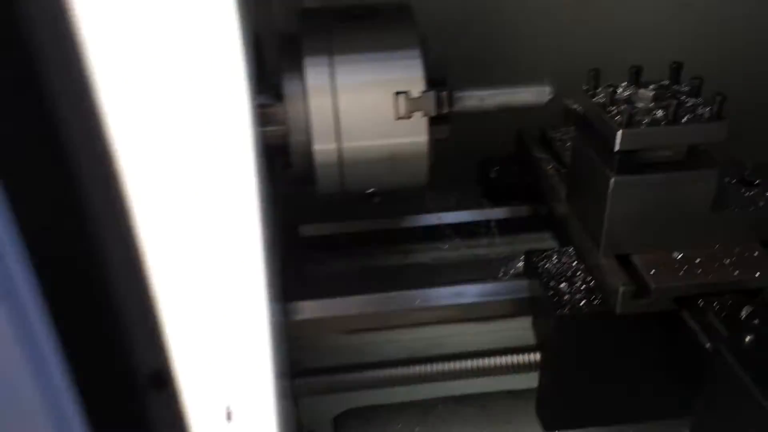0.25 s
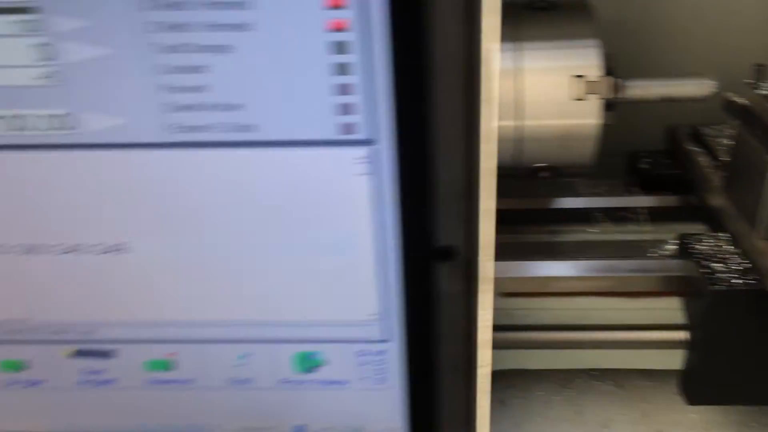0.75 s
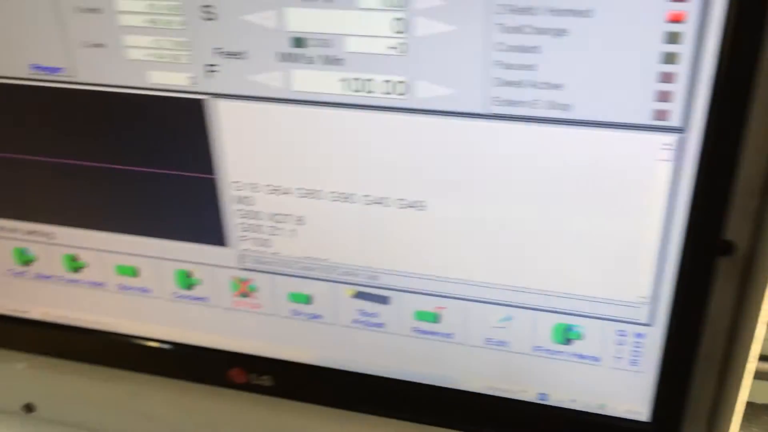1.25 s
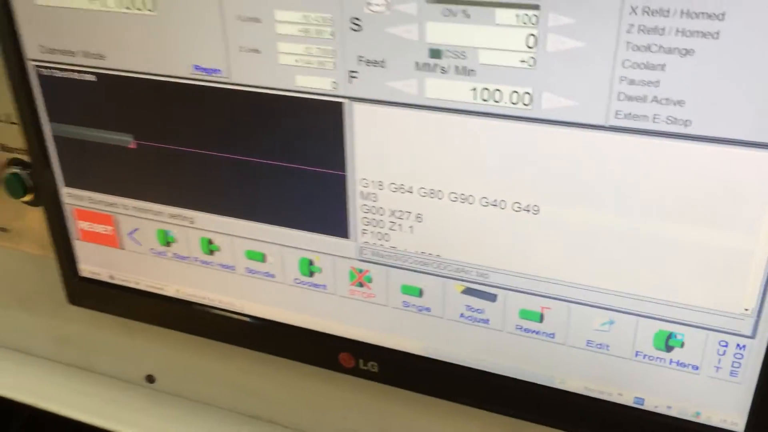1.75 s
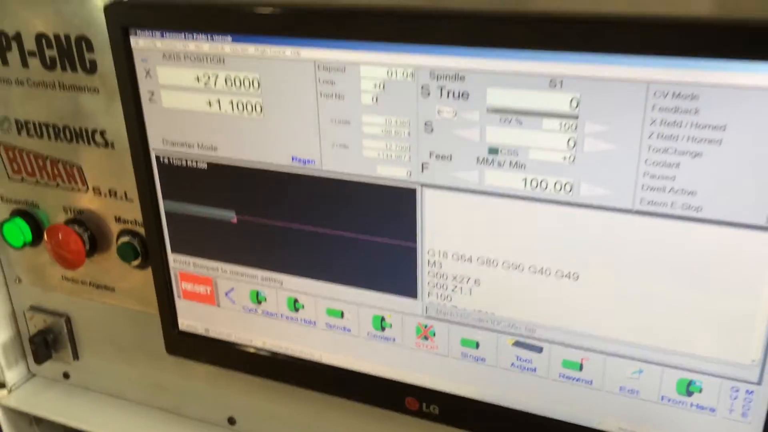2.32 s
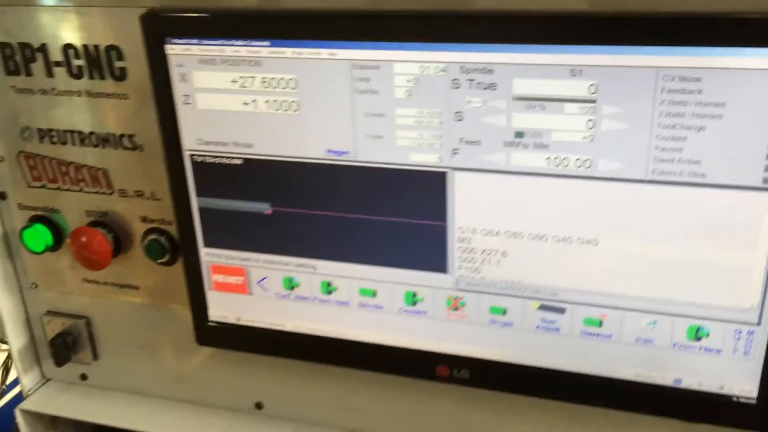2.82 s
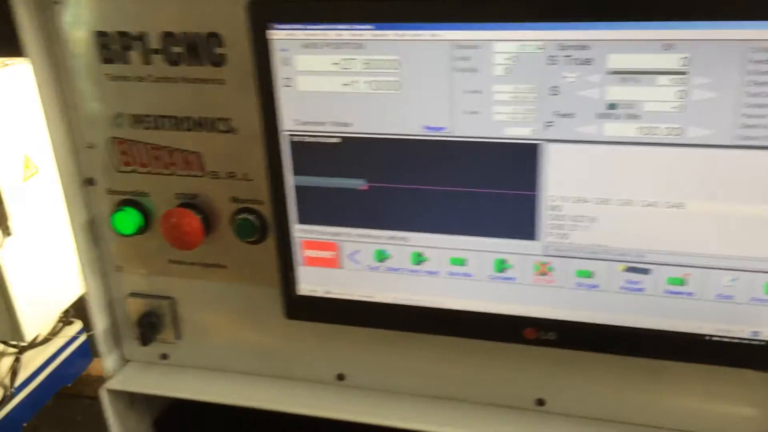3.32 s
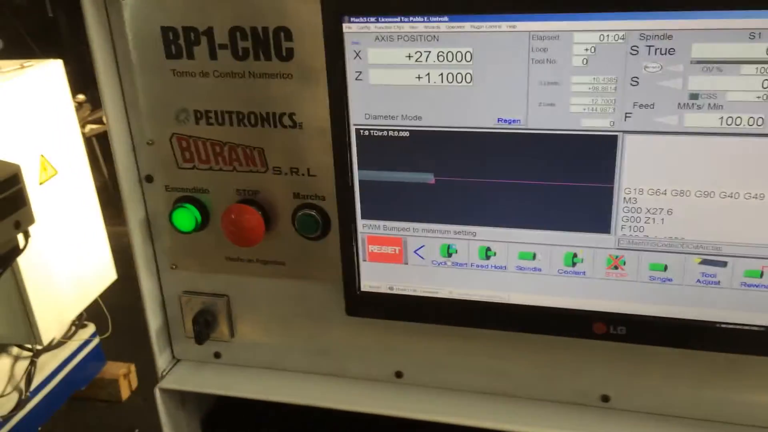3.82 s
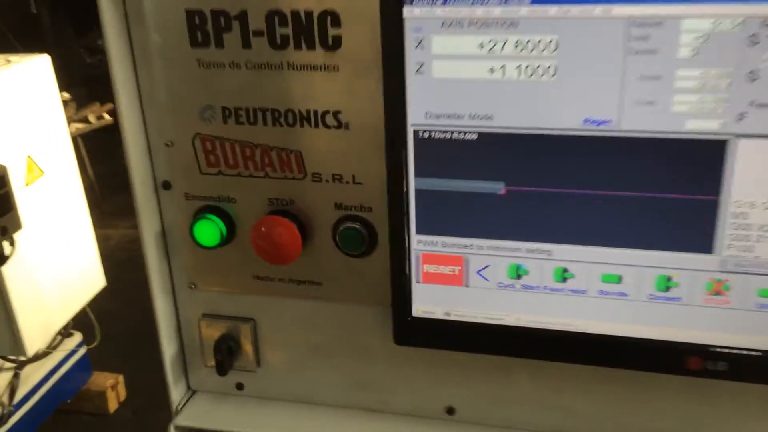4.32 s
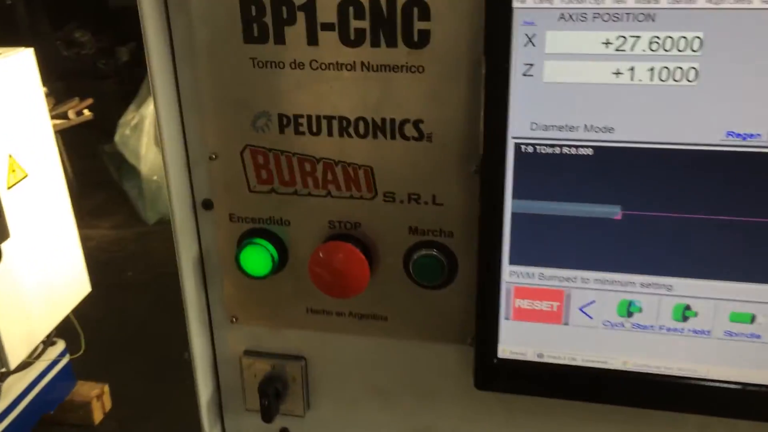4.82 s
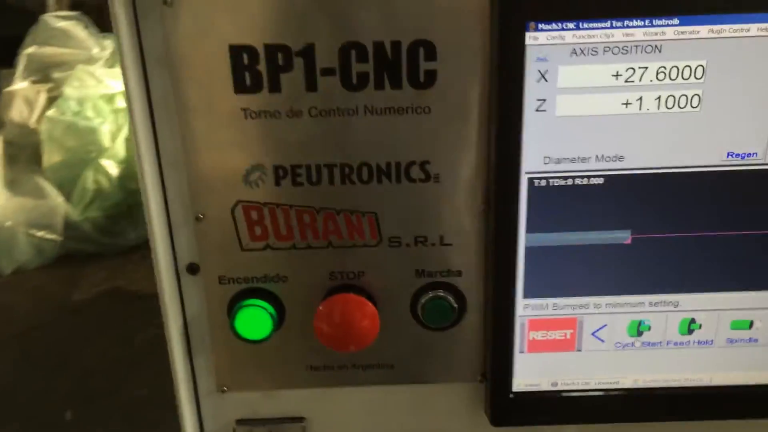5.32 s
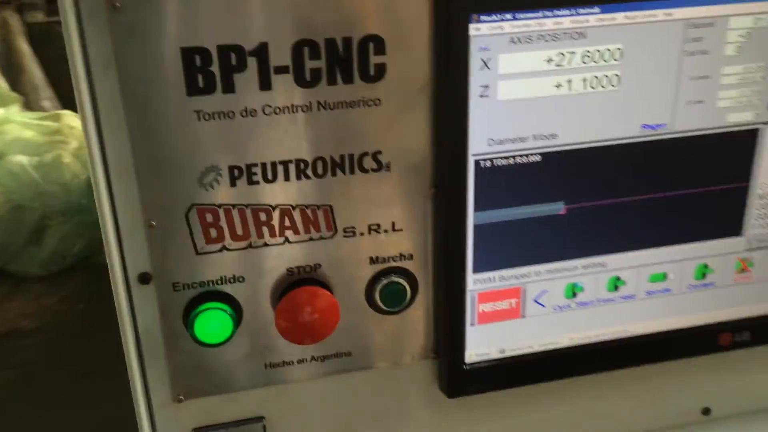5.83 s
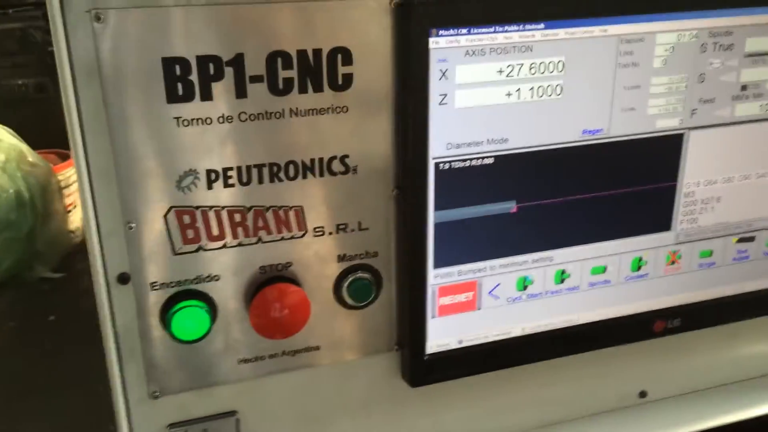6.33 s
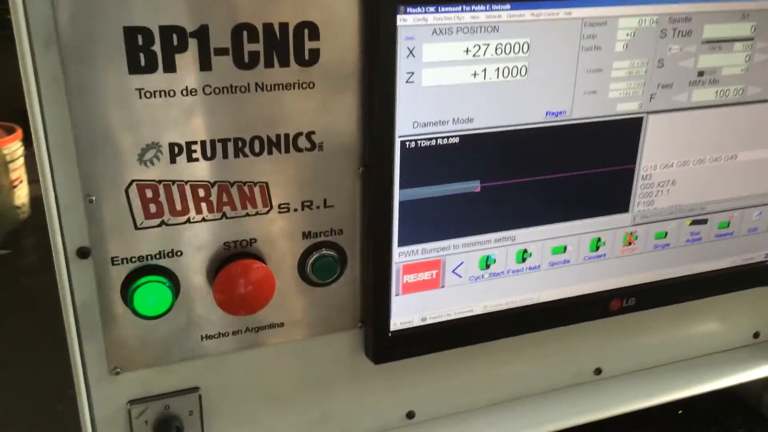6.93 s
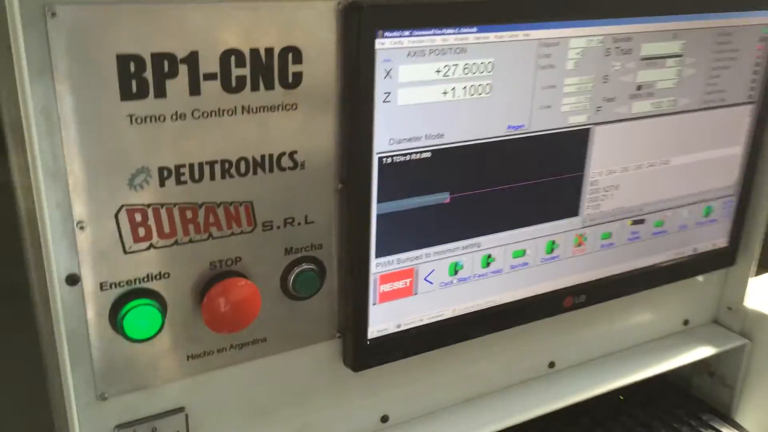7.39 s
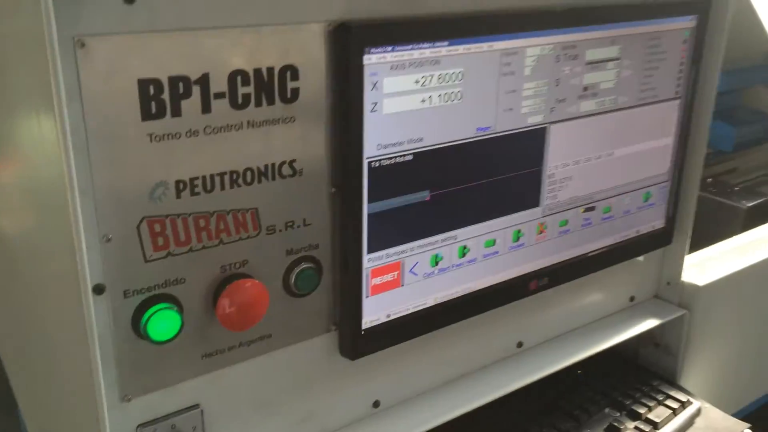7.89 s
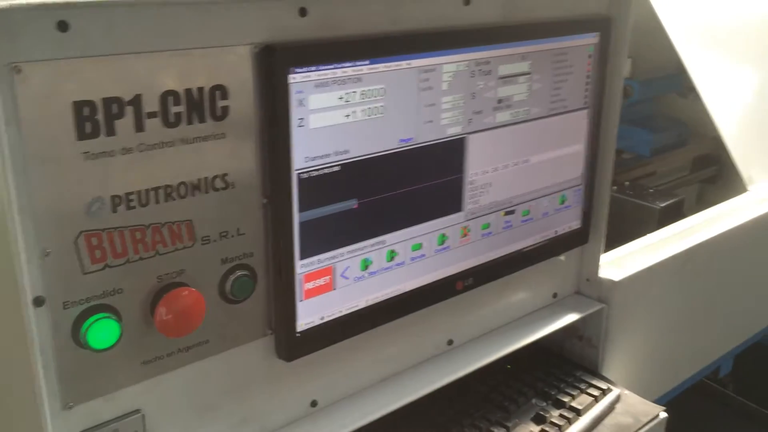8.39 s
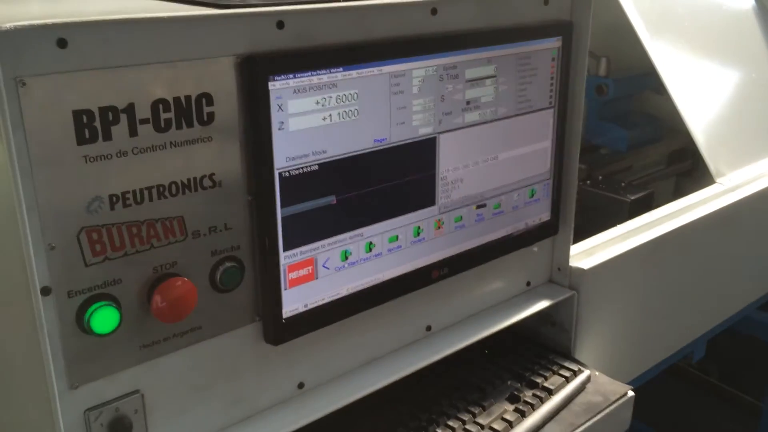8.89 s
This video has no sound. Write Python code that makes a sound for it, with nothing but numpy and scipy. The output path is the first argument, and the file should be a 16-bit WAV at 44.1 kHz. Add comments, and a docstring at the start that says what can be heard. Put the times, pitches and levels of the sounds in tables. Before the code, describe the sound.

A strong, bright hiss of compressed air is heard from the start, close to a lathe in a workshop. A thin, high whistle sputters on top, while a quieter drive hum and cooling fan run steadily underneath throughout. The hiss surges unevenly, turning rougher or sharper as the air lands, with flares around 0.8 seconds, from 2.2 to 2.7 seconds and from 4.5 to 5.3 seconds. At about 6.1 seconds the air shuts off and dies away in the hall, leaving the hum and fan. The hose gives one soft spit at 6.6 seconds. At about 7.5 seconds the jet and its whistle restart abruptly. Just after, near 7.7 seconds, a low thump shudders through the sheet-metal housing and fades within about half a second. The hiss continues, swelling again until the end, just past 9 seconds.

```python
"""A strong hiss, most likely a compressed-air jet, beside a CNC lathe in a workshop.
The turbulent air roars where it lands; eddies at the nozzle add a thin whistle.
The valve shuts, the hiss dies away in the hall, the hose spits once and the jet restarts.
Just after that a low thump shudders through the sheet-metal housing.
The drives hum and a cooling fan runs throughout."""
import sys
import numpy as np
from scipy import signal
from scipy.fft import rfft, irfft
from scipy.io import wavfile
from scipy.ndimage import uniform_filter1d

SR = 44100
rng = np.random.default_rng(int(sys.argv[2]) if len(sys.argv) > 2 else 0)


def transcribe(u):
    """Save the signal u as a 16-bit wav file named by the first command-line argument.

    u: samples, shape (n,) or (channels, n), limited to [-1, 1]; the rate is SR.
    q: integer samples, one column per channel.
    """
    v = np.clip(np.atleast_2d(u).T, -1, 1)
    q = np.round(v * 32767).astype(np.int16)
    wavfile.write(sys.argv[1], SR, q)


N = 403498
TIME_S, FREQS_HZ = np.arange(N) / SR, np.fft.rfftfreq(N, 1 / SR)
SHUT_S, REOPEN_S = 6.14, 7.457  # air valve

# Air hiss spectrum. Each row: frequency in Hz, relative density in dB.
HISS_SPECTRUM = [(500, -48), (1800, -16), (3000, -12.5), (4000, -4), (5200, 0), (7000, 0.5), (9500, -0.5),
                 (11500, -4.5), (15000, -6)]


def compressed_air():
    """Two runs of the jet, with hall decay and a puff in the pause."""
    # Hiss and whistle envelopes per run. Each row: time in seconds, level in dB.
    first_flow = [(.06, -30), (.19, -27), (.38, -27), (.55, -23.6), (.72, -29), (.86, -24.5), (1.05, -25.5),
                  (1.47, -27.8), (1.66, -25.5), (1.97, -31.5), (2.2, -26), (2.29, -33), (2.38, -29),
                  (2.75, -32.5), (2.95, -29), (4.38, -31.5), (4.72, -28), (5.5, -31.5), (6.1, -25.5)]
    second_flow = [(7.56, -21), (7.88, -27), (8.03, -24), (8.31, -25.5), (8.37, -30.5), (8.5, -28),
                   (8.75, -29), (8.95, -25.5), (9.15, -27.5)]
    first_whistle = [(0, -35.5), (.17, -30.5), (.88, -30.5), (1.02, -35.5), (1.6, -29), (1.98, -36.5),
                     (2.14, -27.5), (2.4, -36.5), (2.8, -38), (3.1, -30), (4.36, -36.5), (4.73, -32),
                     (4.79, -26), (4.87, -34.5), (5.7, -35), (6.1, -33)]
    second_whistle = [(7.52, -28), (7.9, -32), (8.17, -27), (8.42, -33), (9.15, -29.5)]
    tone, overtones = nozzle_whistle()
    first = jet(first_flow, first_whistle, tone, overtones,
                roar_db=-39.5, beam_db=-26.8, overtone_db=-10.7)
    rise_s = 0.05
    valve = np.clip((TIME_S - REOPEN_S) / rise_s, 0, 1) ** 2
    # the tone needs pressure: gated twice, it lags the hiss
    second = jet(second_flow, second_whistle, tone * valve, overtones,
                 roar_db=-44, beam_db=-26, overtone_db=-11)
    return hall_decay(first) + hose_puff() + second * valve


def jet(flow, whistle_levels, tone, overtones, roar_db, beam_db, overtone_db):
    """Turbulent air: broad hiss, roar on impact, a treble beam and the nozzle's whistle."""
    # Each row: frequency in Hz, relative density in dB.
    roar_spectrum = [(150, -25), (400, -17), (700, -12.5), (1300, -6), (1900, -0.5), (2700, 0), (3700, 1.5),
                     (5200, -5.5), (9000, -27)]
    beam_spectrum = [(3000, -62), (7000, -11), (9500, -6.5), (11300, -3), (13300, -1.5), (15200, -1.5)]
    # Swings toward the listener; sweeps over a surface.
    # Each row: start in seconds, length in seconds, boost in dB.
    swings = [(.76, .07, 4), (2.172, 0.059, 6), (2.355, 0.36, 8.8), (3.05, .1, 2), (4.47, 0.091, 2.5),
              (4.66, 0.17, 4), (4.93, 0.14, 4), (5.2, 0.14, 5), (7.49, .09, 0), (8.9, 0.076, 4.5),
              (9.03, .12, 3.5)]
    strikes = [(.84, 0.13, 6.5), (1.98, 0.26, 3.5), (2.98, 0.19, 3), (3.3, 1.06, 1), (4.48, 0.32, 5.5),
               (4.78, 0.18, 2), (4.98, 0.12, 4.5), (5.22, .1, 4.5), (7.5, 0.26, 5), (7.97, 0.081, 6),
               (8.7, 0.47, 6)]
    # The beam turns aside and stays there. Each row: time in seconds, gain in dB.
    turn_aside = [(5.75, 0.5), (6.14, -5)]
    flow_db, flare_db = envelope_db(flow), swells_db(swings, edge_s=0.0073)
    # turned toward the listener, less air lands
    roar_gain = amp(roar_db + swells_db(strikes, edge_s=0.028) - 0.25 * flare_db)
    usual_flow_db, panel_echo_s = -27.5, 0.0011
    beam_gain = amp(beam_db + 0.96 * (flow_db - usual_flow_db) + flare_db + envelope_db(turn_aside))
    panel_comb = abs(1 + 0.08 * np.exp(-2j * np.pi * FREQS_HZ * panel_echo_s))
    air = amp(flow_db) * noise(spectrum(HISS_SPECTRUM))
    air += roar_gain * noise(spectrum(roar_spectrum)) * flutter(depth_db=0.72, rate_hz=23)
    air += beam_gain * noise(spectrum(beam_spectrum) * panel_comb) * flutter(depth_db=0.4, rate_hz=22)
    air += amp(envelope_db(whistle_levels)) * tone
    air += amp(overtone_db) * beam_gain * overtones
    return air * flutter(depth_db=0.26, rate_hz=45)


def nozzle_whistle():
    """Eddy tone and overtones; the pitch wanders with pressure and starts flat on reopening."""
    # Each row: pitch multiple, noise bandwidth in Hz, relative level in dB.
    core_and_skirt = [(1, 39, -2), (1, 200, -4.5)]
    upper_partials = [(2, 290, -0.5), (3, 410, -3.5)]
    base_hz, creep_hz_per_s, wander_hz = 4457, 1.1, 19
    flat_hz, catch_s, catch_width_s = 283.4, 0.058, 0.004
    building = (TIME_S > REOPEN_S) * (1 - np.tanh((TIME_S - REOPEN_S - catch_s) / catch_width_s)) / 2
    pitch_hz = base_hz + creep_hz_per_s * TIME_S + wander_hz * drift(13.93) - flat_hz * building
    # sputters as the eddies catch and slip
    tone = eddy_tones(core_and_skirt, pitch_hz) * flutter(depth_db=1.8, rate_hz=24)
    return tone, eddy_tones(upper_partials, pitch_hz)


def eddy_tones(partials, pitch_hz):
    """Eddies sustain narrow noise bands at even strength."""
    cycles = np.cumsum(pitch_hz) / SR
    tone = np.zeros(N)
    for multiple, width_hz, db in partials:
        phase = 2 * np.pi * round(multiple) * cycles
        tone += amp(db) * (drift(width_hz) * np.cos(phase) + drift(width_hz) * np.sin(phase))
    return level_out(tone, window_samples=4000)


def hall_decay(air, near_share=0.48, near_t60_s=0.32):
    """After shut-off the near sound falls fast; the hall rings on, treble dying first."""
    # Each row: frequency in Hz, T60 in seconds.
    hall_t60 = [(500, 1.8), (2000, 1.9), (4400, 1.28), (7000, 0.99), (10000, 0.75), (15000, 0.42)]
    hz, frame_s, bins = signal.stft(air, SR, nperseg=512, noverlap=384)
    since_s = np.maximum(frame_s - SHUT_S, 0)
    near = amp(-60 * since_s / near_t60_s)
    hall = amp(-60 * since_s / log_interp(hall_t60, hz)[:, None])
    gain = np.sqrt(near_share * near ** 2 + (1 - near_share) * hall ** 2)
    return signal.istft(bins * gain, SR, nperseg=512, noverlap=384)[1][:N]


def hose_puff(peak_s=6.614, width_s=0.026, level_db=-56):
    """The emptying hose spits softly."""
    return amp(level_db) * np.exp(-((TIME_S - peak_s) / width_s) ** 2) * noise(spectrum(HISS_SPECTRUM))


def housing_thump():
    """Upper panel modes answer at once and die first; the boom swells more slowly."""
    # Each row: frequency in Hz, width in Hz, relative level in dB.
    boom_modes = [(62, 16, -20), (113, 7.1, -7), (131, 17, 0), (155, 9.4, 3.5), (173, 18, -2.5),
                  (209, 25, -8)]
    rattle_modes = [(228, 19, -3.5), (260, 16, -6), (292, 20, -8), (315, 16, -3), (343, 36, -11.5),
                    (444, 46, -25)]
    boom = panel_ring(boom_modes, level_db=-31.5, rise_s=0.02, hold_s=0.14,
                      fall_db_per_s=57, throb_db=3.5)
    rattle = panel_ring(rattle_modes, level_db=-38, rise_s=0.0026, hold_s=0.1,
                        fall_db_per_s=56, throb_db=1)
    return boom + rattle


def panel_ring(modes, level_db, rise_s, hold_s, fall_db_per_s, throb_db):
    """A rough push drives the modes; they hold briefly, then decay, throbbing."""
    start_s, throb_delay_s, throb_period_s = 7.651, 0.11, 0.12
    since_s = np.maximum(TIME_S - start_s, 0)
    power = sum((amp(db) / (1 + ((FREQS_HZ - hz) / (0.7 * width_hz)) ** 2)) ** 2
                for hz, width_hz, db in modes)
    ring = level_out(noise(np.sqrt(power)), window_samples=1400)
    attack = 1 - np.exp(-since_s / rise_s)
    throb = np.cos(2 * np.pi * (since_s - throb_delay_s) / throb_period_s)
    fall_db = fall_db_per_s * np.maximum(since_s - hold_s, 0)
    return ring * attack * amp(level_db + throb_db * throb - fall_db)


def control_cabinet():
    """Hum and fan noise, louder when the listener is nearer."""
    # Each row: time in seconds, gain in dB.
    nearness = [(0, 1.5), (1, -3.5), (2, -1.5), (2.6, -4), (3.3, -2), (6.1, 0.5), (7.4, 1.5), (8.3, 0),
                (9.15, 0)]
    return (drive_hum() + cooling_fan()) * amp(envelope_db(nearness))


def drive_hum(motor_hz=64.87, gain_db=-2.5, pitch_waver=0.00114):
    """Drive and fan tones plus motor orders, wavering together."""
    # Each row: frequency in Hz, relative level in dB.
    steady_tones = [(40, -73), (100, -66), (180, -64.5), (199.5, -63), (217, -85), (286, -71.5),
                    (627.7, -74), (670.7, -65), (842.4, -81), (1111.5, -68), (1614.5, -66), (1886.6, -85),
                    (1936.3, -65), (2034.9, -63.5)]
    # Each row: multiple of the rotation rate, relative level in dB.
    motor_orders = [(1, -67.5), (2, -69), (3, -63), (4, -69), (5, -71), (8, -74.5)]
    motor_tones = [(round(order) * motor_hz, db) for order, db in motor_orders]
    warped_s = TIME_S + np.cumsum(pitch_waver * drift(3.1)) / SR
    hum = sum(amp(db) * np.sin(2 * np.pi * (hz * warped_s + rng.random()))
              for hz, db in list(steady_tones) + motor_tones)
    return np.sqrt(2) * amp(gain_db) * hum


def cooling_fan(level_db=-51.8, low_cut_hz=34):
    """Broad rush of the fan and workshop."""
    # Each row: frequency in Hz, relative density in dB.
    fan_spectrum = [(15, -48), (25, -17), (59, -7), (163, -5), (197, -5.5), (356, -16.5), (592, -13),
                    (659, -11.5), (714, -12), (986, -10.5), (1220, -13.5), (1980, -13.5), (2150, -17.5),
                    (8200, -28), (15200, -36)]
    low_cut = 1 / np.sqrt(1 + (low_cut_hz / (FREQS_HZ + 1)) ** 8)
    return amp(level_db) * noise(spectrum(fan_spectrum) * low_cut)


def metal_reflections(x, depth_db=3.5):
    """Echoes off nearby metal: spectral peaks and dips that drift as the listener moves."""
    # Each row: frequency in Hz, share of the depth.
    depth_shares = [(250, 0.31), (500, 0.77), (3000, 0.46), (4400, 0.12), (12000, 0.37)]
    hz, _, bins = signal.stft(x, SR, nperseg=2048)
    ripple = uniform_filter1d(rng.standard_normal(bins.shape), size=4, axis=0)  # over frequency
    ripple = unit_rms(uniform_filter1d(ripple, size=60, axis=1))  # over time
    ripple_db = depth_db * log_interp(depth_shares, hz)[:, None] * ripple
    return signal.istft(bins * amp(ripple_db), SR, nperseg=2048)[1][:N]


def amp(db):
    """Decibels to gain."""
    return 10 ** (np.asarray(db) / 20)


def unit_rms(x):
    """Scales to rms 1."""
    return x / np.sqrt(np.mean(x ** 2) + 1e-20)


def level_out(x, window_samples):
    """Holds the running rms near 1."""
    return x / np.sqrt(uniform_filter1d(x ** 2, size=window_samples) + 1e-6)


def log_interp(rows, hz):
    """Interpolates over log frequency."""
    row_hz, values = np.transpose(rows)
    return np.interp(np.log(hz + 1), np.log(row_hz + 1), values)


def spectrum(rows):
    """Gain per FFT bin from Hz, dB rows."""
    return amp(log_interp(rows, FREQS_HZ))


def envelope_db(rows):
    """Level per sample from time, dB rows."""
    return np.interp(TIME_S, *np.transpose(rows))


def swells_db(rows, edge_s):
    """Flat-topped rises with soft edges."""
    return sum(db * (np.tanh((TIME_S - start_s) / edge_s)
                     - np.tanh((TIME_S - start_s - length_s) / edge_s)) / 2
               for start_s, length_s, db in rows)


def noise(bin_gain):
    """Shaped noise of rms 1."""
    return unit_rms(irfft(rfft(rng.standard_normal(N)) * bin_gain, N))


def drift(rate_hz):
    """Low-passed noise of rms 1."""
    return noise(1 / (1 + (FREQS_HZ / rate_hz) ** 2))


def flutter(depth_db, rate_hz):
    """Randomly wavering gain."""
    return amp(depth_db * drift(rate_hz))


def scene():
    """Jet and machine with reflections, the same in both channels."""
    mix = compressed_air() + control_cabinet() + housing_thump()
    return np.tile(metal_reflections(mix), (2, 1))


def record(dry):
    """Steep low-pass."""
    cutoff_hz = 15280
    taps = signal.firwin(1023, cutoff_hz, window=("kaiser", 8), fs=SR)
    return signal.oaconvolve(dry, taps[None], "same")


dry = scene()
out = record(dry)
transcribe(out)
```